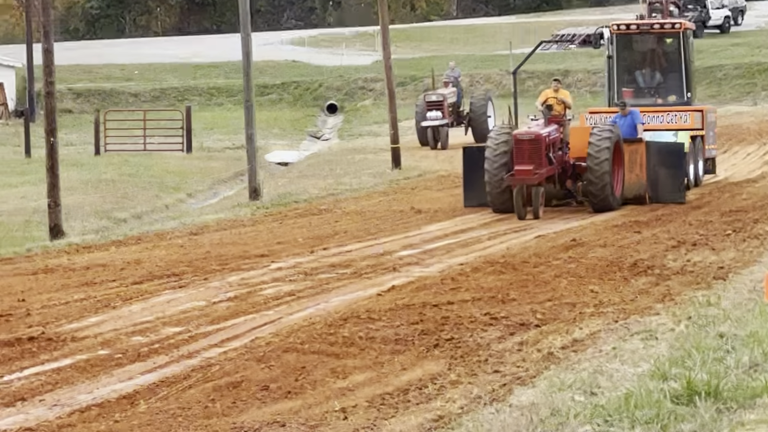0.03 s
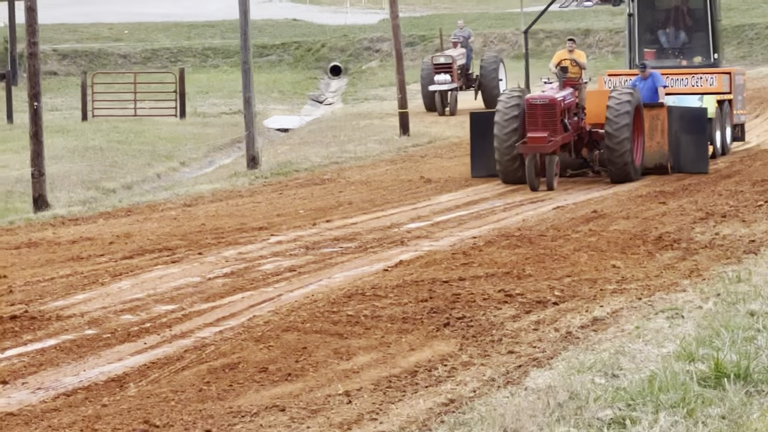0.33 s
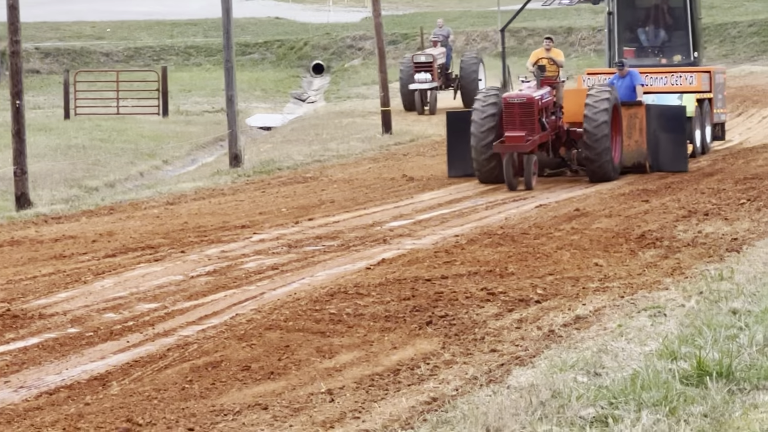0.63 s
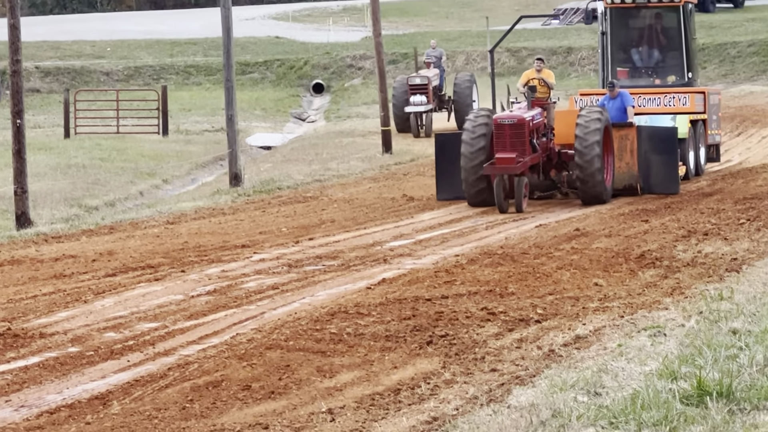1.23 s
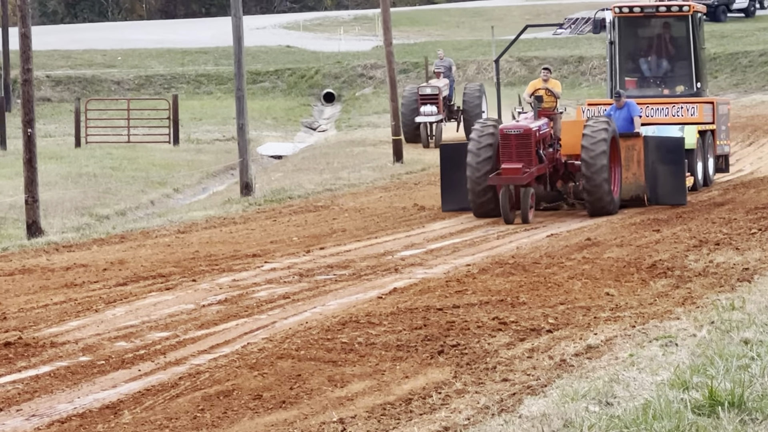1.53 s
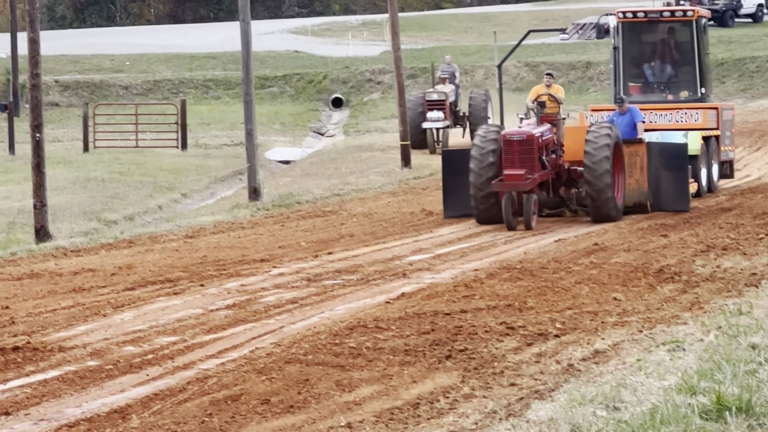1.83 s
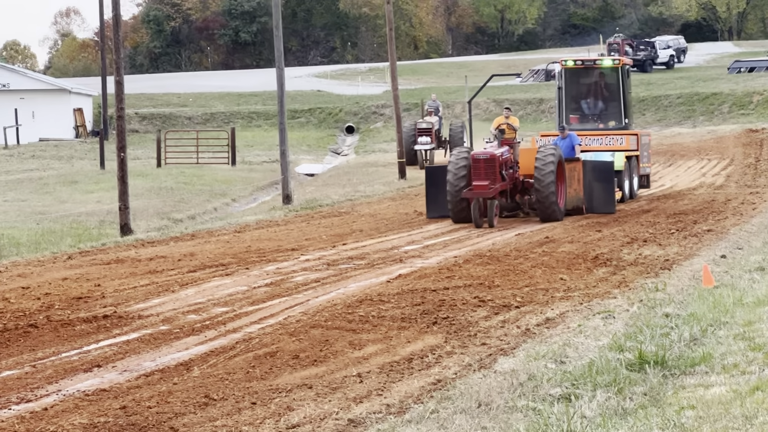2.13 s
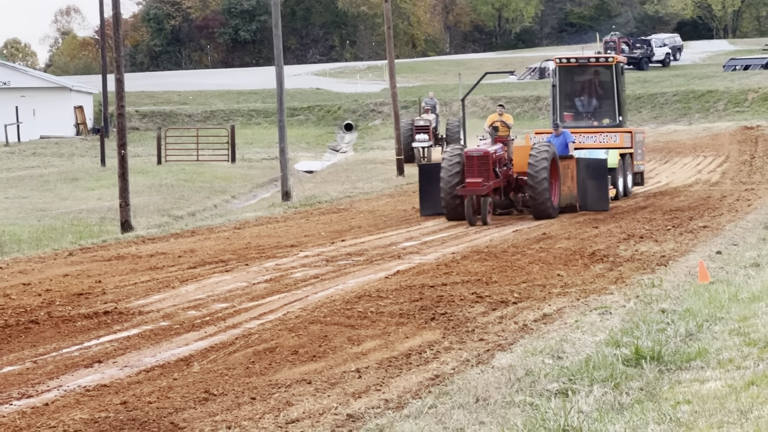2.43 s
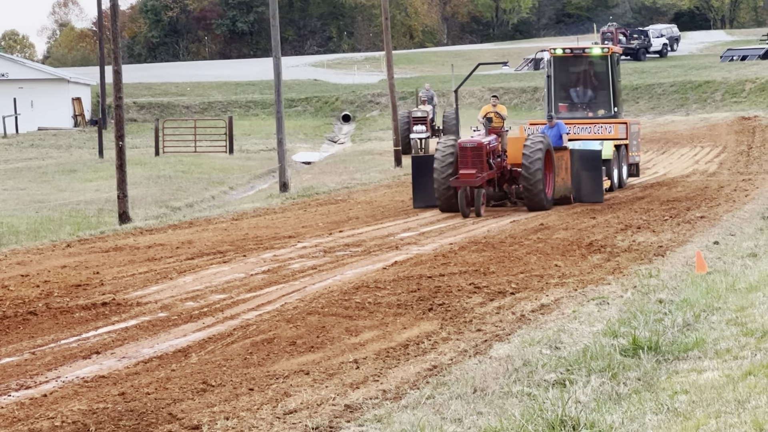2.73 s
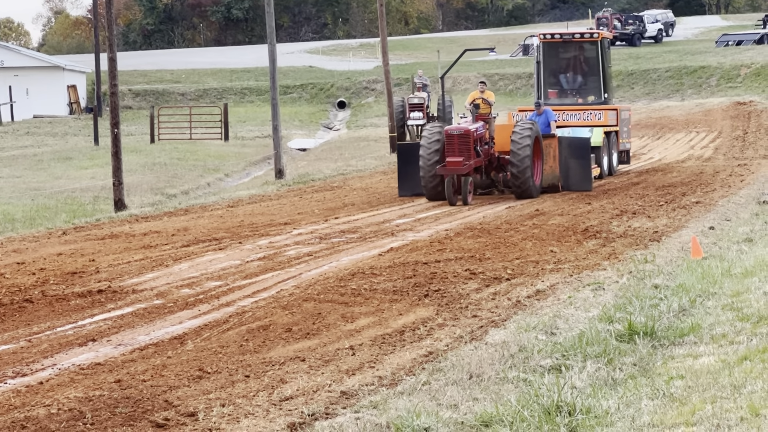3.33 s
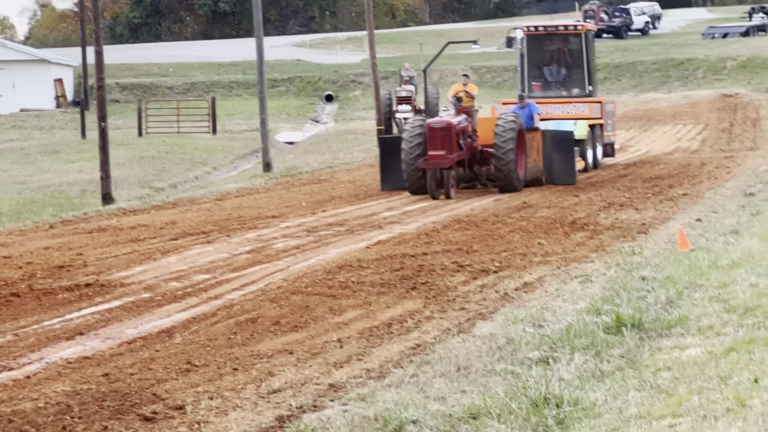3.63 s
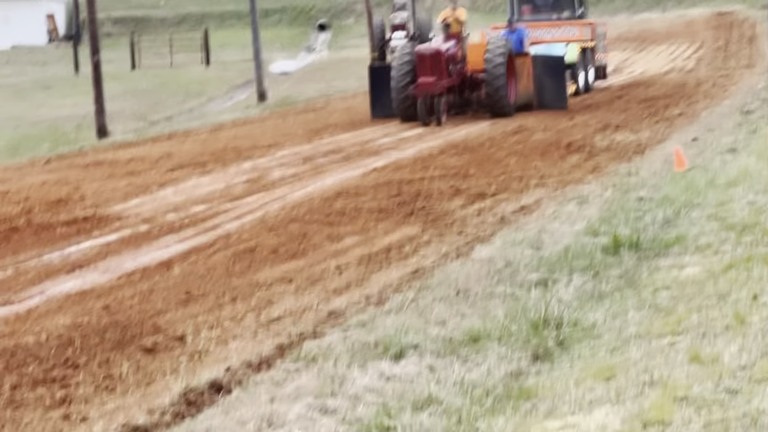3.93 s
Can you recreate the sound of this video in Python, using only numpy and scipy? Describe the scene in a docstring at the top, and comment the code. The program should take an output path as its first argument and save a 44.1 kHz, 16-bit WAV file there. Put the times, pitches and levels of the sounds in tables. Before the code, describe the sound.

An old tractor engine drones throughout the four seconds, its deep, throbbing exhaust spitting rapid, gritty pulses as it pulls a sled. It rises slightly in pitch and level at about 1.2 seconds and strains hardest around 3 seconds. A few firings bark harder, most clearly near 2.9 and 3.5 seconds. Underneath run a second engine's low hum, machinery clatter and scraping dirt, with a short, dull outdoor echo.

```python
"""A deep, throbbing exhaust boom: an old four-cylinder tractor drags a weight sled up a dirt track.
Its straight stack booms at twice the firing rate; each firing spits gritty gas and rings the pipe,
and a few bark harder. Behind it a second engine hums at a near-steady speed, over a wide bed of
machinery clatter and scraping dirt. A short, dull echo sets it all in the open air."""
import sys
import numpy as np
from scipy import signal
from scipy.fft import rfft, irfft
from scipy.io import wavfile
from scipy.ndimage import uniform_filter1d

SR = 44100
rng = np.random.default_rng(int(sys.argv[2]) if len(sys.argv) > 2 else 0)


def output_pcm(signal):
    """Save a mono or channel-first signal as 16-bit PCM at the path in sys.argv[1].

    Samples are clipped to [-1, 1] before scaling.
    """
    pcm = np.clip(np.atleast_2d(signal).T, -1, 1) * 32767
    wavfile.write(sys.argv[1], SR, np.round(pcm).astype(np.int16))


N = 176400
T = np.arange(N) / SR

# tractor's firing rate: t/s, f/Hz
FIRING_RATE = [(0.0, 52.04), (0.35, 53.97), (0.6, 53.72), (0.85, 53.03), (1.2, 55.62), (1.5, 55.25),
               (1.9, 54.93), (2.3, 54.36), (2.8, 54.11), (3.1, 55.24), (3.45, 56.5), (3.75, 56.2),
               (4.0, 55.95)]
# faders that follow the tractor's strain: t/s, boom level/dB, ring level/dB, gas level/dB
STRAIN = [(0, -15, -38, -38), (.3, -15.5, -34, -42), (.72, -16, -39.5, -33), (1.0, -15.5, -32, -39.5),
          (1.22, -13.5, -34.5, -38), (1.7, -13.5, -36.5, -41.5), (2.15, -13.3, -35.5, -39.5),
          (2.65, -13.1, -35, -38), (2.95, -12, -32.5, -35), (3.25, -12, -32.5, -37), (3.6, -12.9, -36, -35),
          (4, -13.5, -35.5, -41.5)]
# partials of the stack's boom: multiple of the four-firing cycle, relative level/dB
BOOM_PARTIALS = [(5, -30.5), (6, -33), (7, -32.5), (8, 0), (9, -34.5), (10, -29), (11, -39.5), (12, -21),
                 (13, -37.5), (14, -44.5), (16, -30.5), (18, -44.5), (20, -46.5), (26, -50), (28, -49)]
# thud at the firing rate, drawn to swell as the engine picks up speed: t/s, level/dB
THUD_LEVEL = [(0, -53), (.35, -36), (.65, -43), (1.15, -32), (1.7, -40), (2.3, -38), (2.6, -41),
              (3.05, -32.5), (3.4, -28), (3.6, -36), (3.8, -32), (4, -44)]
# accent of each cylinder, in firing order: relative level/dB
CYLINDER_ACCENTS = [4.5, -1.3, 2.7, 3]
# pipe resonances: f/Hz, width/Hz, relative level/dB at the start, relative level/dB at the end
PIPE_MODES = [(545, 40, -3.5, -6.5), (622, 57, -8, -4), (827, 67, -1.5, 5), (1064, 69, 1.5, 3.5),
              (1152, 55, 4, -0.5), (1440, 120, -3.5, -18.5), (1675, 53, -5, -10), (1876, 100, -5.5, -11),
              (2087, 71, -5.5, 1), (2498, 130, -13.5, -1.5), (2925, 78, -11.5, -9), (4330, 220, -9.5, -12)]
# EQ of the gas bursts: f/Hz, relative level/dB
GAS_EQ = [(300, -12.5), (700, -1.5), (1500, -2), (2600, 0), (3400, -1), (4250, 2.5), (5050, -10),
          (5800, -4), (6450, -9), (7100, -2), (7950, -7.5), (8750, -2.5), (9600, -13.5), (10700, -12),
          (12000, -23), (12700, -29.5), (13400, -23), (15800, -25.5)]
# hard firings: t/s, level/dB, centre f/Hz, width/Hz
HARD_FIRINGS = [(.886, -28, 5100, 2000), (.998, -28.5, 854, 400), (2.213, -26.5, 2427, 451.3),
                (2.419, -27, 1134, 395.8), (2.861, -19.5, 943.5, 592), (2.915, -24.5, 820, 250),
                (3.026, -27.5, 814.2, 298.7), (3.508, -22, 1063, 394.7), (3.579, -37, 1721, 1499),
                (3.879, -28, 2100, 500), (3.933, -23.5, 1060, 447)]
# second engine's firing rate: t/s, f/Hz
HUM_RATE = [(0, 66.8), (.25, 66.7), (.45, 68), (.8, 67.2), (1.5, 66.4), (3, 67.7), (4, 67.2)]
# its harmonics: multiple of the firing rate, level/dB at the start, level/dB at the end
HUM_PARTIALS = [(1, -25, -28.5), (2, -27.5, -31), (3, -46, -35.5), (4, -60, -57), (5, -52.5, -66),
                (8, -45.5, -54)]
# EQ of the machinery and scraping dirt: f/Hz, relative level/dB
CLATTER_EQ = [(25, -2), (40, 8), (90, 7.5), (180, 10.5), (250, 0.5), (330, -6), (430, -3.5), (550, 1.5),
              (950, 1), (1700, 0), (2600, -4.5), (4200, -12), (5200, -20), (7300, -17.5), (8800, -25.5),
              (10500, -29), (15500, -45.5)]
# clatter fader: t/s, level/dB
CLATTER_FADER = [(0, -31), (1.1, -32), (1.9, -33.5), (2.6, -33), (3.1, -31), (4, -35)]
# stereo width of the clatter: f/Hz, side level/dB relative to mid
CLATTER_SIDE_EQ = [(40, -13.5), (130, -3), (300, -1), (700, -3.5), (1500, -5.5), (2200, -12.5),
                   (4500, -7.5), (9000, -12), (14000, -3.5)]
# phase lead of the left channel over the right: f/Hz, lead/rad
LEFT_LEAD = [(0, 0), (400, .15), (780, -.15), (1200, 0), (1460, -.6), (2070, -.3), (3270, -.6), (5000, -.2),
             (6800, 0), (7700, -.6), (8350, -.75), (8900, 0), (9300, 1.2), (10500, 3.1), (11400, 4.5),
             (12000, 6.1), (12700, 6.4), (13900, 9.4), (15300, 12.5)]

START_PHASE, BURST_PHASE = .2, .46  # fractions of one firing period
BOOM_SCATTER_DB, BURST_SCATTER_DB, RING_SCATTER_DB, JITTER_S = .6058, 1.15, 1.4, .00016
GAS_RISE_S, GAS_FALL_S, AFTERPUFF_DB, GRIT_DB = .0019, .002, -11, 3
RING_RISE_S, RING_FALL_S, KNOCK_GAIN, PIPE_TOP_HZ = .002, .004, .36, 4700
BARK_RISE_S, BARK_FALL_S = .00057, .0043
ECHO_DB, ECHO_RISE_S, ECHO_T60_S, ECHO_DAMP_HZ = -4, .004795, .4, 1660
BASS_PAN_DB = -1.1434  # left minus right
CLATTER_LOW_CUT_HZ, TOP_HZ = 34, 15800


def stack_boom(firings, wobble):
    """The stack's low note over a thud at the firing rate; unequal cylinders add weak partials."""
    cycles = firings / len(CYLINDER_ACCENTS)
    note = sum(undb(db) * np.cos(2 * np.pi * round(k) * cycles) for k, db in BOOM_PARTIALS)
    thud = undb(curve(THUD_LEVEL)) * np.sin(2 * np.pi * firings)
    uneven = undb(BOOM_SCATTER_DB * np.interp(firings, np.arange(len(wobble)), wobble))
    return np.sqrt(2) * (note * undb(curve(STRAIN, column=1)) + thud) * uneven


def exhaust(firings, jitter, burst_scatter, ring_scatter):
    """Each firing spits gas and rings the pipe, with a faint puff of gas between firings."""
    index, rate = firings.astype(int), curve(FIRING_RATE)
    age = (firings - index - BURST_PHASE) / rate + JITTER_S * jitter[index]
    accent_db = np.array(CYLINDER_ACCENTS)[index % len(CYLINDER_ACCENTS)]
    force = undb(accent_db + BURST_SCATTER_DB * burst_scatter[index])
    afterpuff_age = ((firings - BURST_PHASE) % 1 - .5) / rate
    afterpuff = undb(AFTERPUFF_DB) * puff(afterpuff_age, GAS_RISE_S, GAS_FALL_S)
    gas = gas_spit(force * puff(age, GAS_RISE_S, GAS_FALL_S) + afterpuff)
    ring = pipe_ring(age, force * undb(RING_SCATTER_DB * ring_scatter[index]))
    return ring * undb(curve(STRAIN, column=2)) + gas * undb(curve(STRAIN, column=3))


def gas_spit(envelope):
    """Gas leaves the stack as bursts of hiss, roughened by a fast flutter in level."""
    hiss = envelope * rng.standard_normal(N)
    return unit(eq(hiss * undb(GRIT_DB * wander(1500)), GAS_EQ))


def pipe_ring(age, force):
    """A sharp knock and a puff of noise from each firing excite the pipe's resonances."""
    knock = np.diff((age > 0) * 1., prepend=0).clip(0)
    rush = puff(age, RING_RISE_S, RING_FALL_S) * rng.standard_normal(N)
    push = force * (KNOCK_GAIN * unit(knock) + unit(rush))
    ring = sum(resonate(push, hz, width) * undb(np.linspace(start_db, end_db, N))
               for hz, width, start_db, end_db in PIPE_MODES)
    return cut(unit(ring), PIPE_TOP_HZ, "low")


def barks():
    """Single firings crack out harder than the rest, each a snap of band-passed noise."""
    out = np.zeros(N)
    for at, db, hz, width in HARD_FIRINGS:
        envelope = puff(T - at, BARK_RISE_S, BARK_FALL_S)
        snap = envelope * rng.standard_normal(N)
        bark = resonate(resonate(snap, hz, width), hz, 2 * width)
        out += undb(db) * bark * np.sqrt(np.sum(envelope ** 2) / np.sum(bark ** 2))
    return out


def second_engine():
    """A governed engine further back, of which only the low hum carries."""
    firings = np.cumsum(curve(HUM_RATE) * (1 + .0027 * wander(4.7))) / SR
    hum = np.zeros(N)
    for k, start_db, end_db in HUM_PARTIALS:
        gain = undb(np.linspace(start_db, end_db, N) + .7 * wander(6.65))
        hum += np.sqrt(2) * gain * np.cos(2 * np.pi * round(k) * firings)
    return hum


def clatter():
    """Gears, tyres and the sled pan in the dirt: a wide, finely grained rush."""
    grain = undb(1.18 * wander(250) + .27 * wander(14))
    rushes = (eq(grain * rng.standard_normal(N), CLATTER_EQ) for _ in range(2))
    mid, side = (unit(cut(rush, CLATTER_LOW_CUT_HZ, "high", order=8)) for rush in rushes)
    width = np.array([[1], [-1]]) * eq(side, CLATTER_SIDE_EQ)
    return (phase_spread(mid) + width) * undb(curve(CLATTER_FADER))


def echo(x):
    """Dull scatter from the sled, the bank and the trees, different at each ear."""
    t = T[:SR // 2]
    envelope = undb(-60 * t / ECHO_T60_S) * (1 - np.exp(-t / ECHO_RISE_S))
    tails = rng.standard_normal((2, len(t))) * envelope
    send = undb(ECHO_DB) * cut(x, ECHO_DAMP_HZ, "low", order=3)
    return np.array([signal.fftconvolve(send, tail / np.linalg.norm(tail))[:N] for tail in tails])


def phase_spread(x):
    """Mono to stereo, as at two microphone ports: the phase difference grows in the treble."""
    hz, lead = np.array(LEFT_LEAD).T
    half_lead = np.interp(np.fft.rfftfreq(2 * N, 1 / SR), hz, lead) / 2
    spectrum = rfft(np.r_[x, x[::-1]])
    return irfft(spectrum * np.exp(1j * np.array([half_lead, -half_lead])))[:, :N]


def undb(db):
    """Decibels to gain."""
    return 10 ** (np.asarray(db) / 20)


def unit(x):
    """Scale to rms 1."""
    return x / np.sqrt(np.mean(x ** 2))


def curve(table, column=1):
    """Automation lane: one column of a time table, joined by straight lines."""
    table = np.array(table)
    return np.interp(T, table[:, 0], table[:, column])


def wander(rate_hz):
    """Smooth random modulation with rms 1."""
    hold = int(SR / rate_hz)
    steps = np.repeat(rng.standard_normal(N // hold + 1), hold)
    return unit(uniform_filter1d(uniform_filter1d(steps, hold), hold)[:N])


def puff(age, rise_s, fall_s):
    """A rounded swell and fall that peaks at age 0."""
    return np.exp(-.5 * (age / np.where(age < 0, rise_s, fall_s)) ** 2)


def eq(x, points):
    """Minimum-phase EQ through points of f/Hz, level/dB."""
    hz, db = np.array(points).T
    size = 2 * N
    f = np.maximum(np.fft.rfftfreq(size, 1 / SR), 1)
    gain = undb(np.interp(np.log(f), np.log(hz), db))
    cepstrum = irfft(np.log(gain))
    cepstrum[1:N] *= 2  # folded forward, so nothing rings ahead of a hit
    cepstrum[N + 1:] = 0
    return irfft(rfft(x, size) * np.exp(rfft(cepstrum)))[:N]


def resonate(x, hz, width_hz):
    """Two-pole resonance, gain 1 at the centre."""
    return signal.lfilter(*signal.iirpeak(hz, hz / width_hz, fs=SR), x)


def cut(x, hz, kind, order=4):
    """Low-pass or high-pass."""
    return signal.sosfilt(signal.butter(order, hz, kind, fs=SR, output="sos"), x)


def scene():
    """Tractor and second engine ahead, clatter and echo all around."""
    firings = START_PHASE + np.cumsum(curve(FIRING_RATE)) / SR  # running count
    jitter, burst_scatter, ring_scatter, wobble = rng.standard_normal((256, 4)).T  # one per firing
    stack = exhaust(firings, jitter, burst_scatter, ring_scatter) + barks()
    pan = undb(np.array([[BASS_PAN_DB], [-BASS_PAN_DB]]) / 2)
    bass = (stack_boom(firings, wobble) + second_engine()) * pan
    return bass + phase_spread(stack) + echo(stack) + clatter()


def record(dry):
    """A steep low-pass takes the very top off the mix."""
    return signal.sosfilt(signal.ellip(10, .2, 80, TOP_HZ, fs=SR, output="sos"), dry)


dry = scene()
out = record(dry)
output_pcm(out)
```